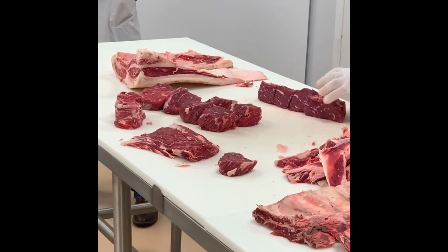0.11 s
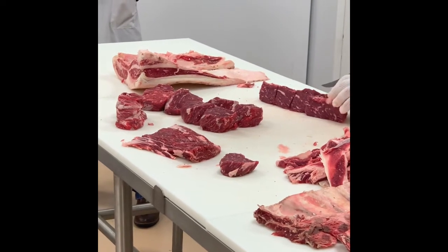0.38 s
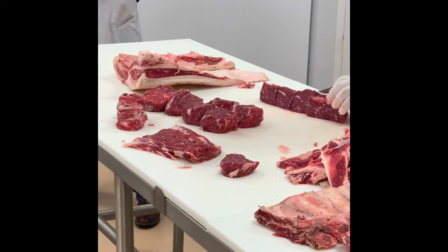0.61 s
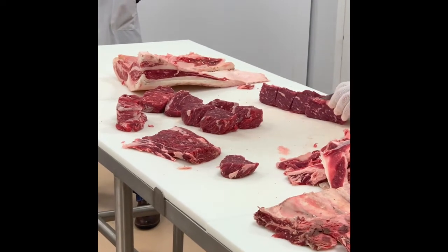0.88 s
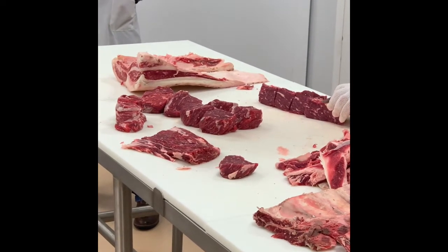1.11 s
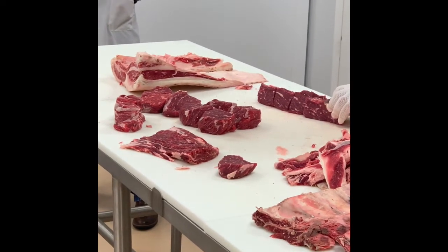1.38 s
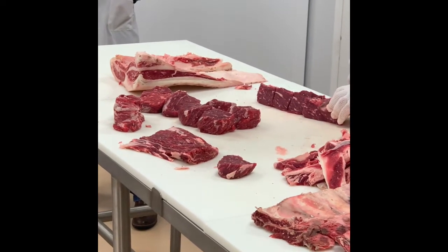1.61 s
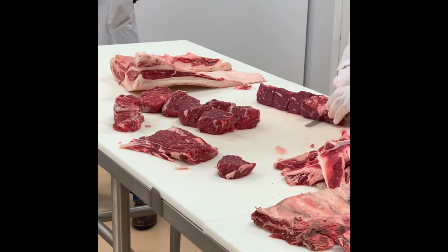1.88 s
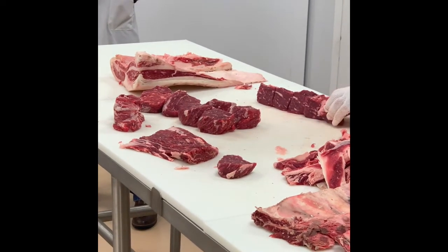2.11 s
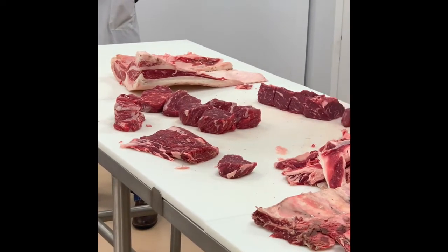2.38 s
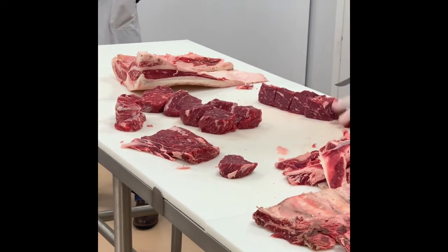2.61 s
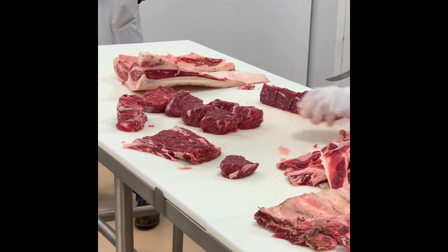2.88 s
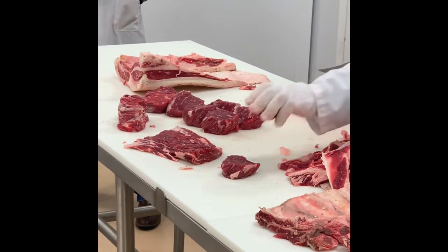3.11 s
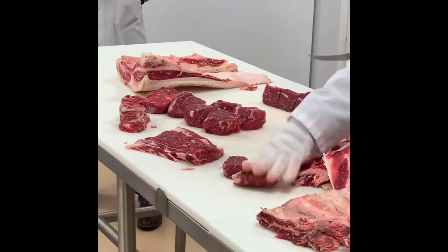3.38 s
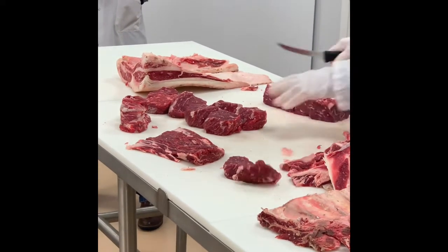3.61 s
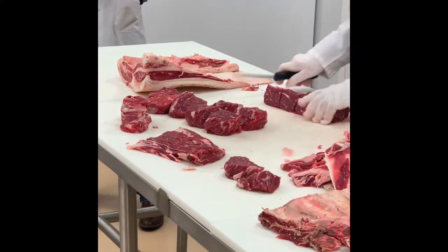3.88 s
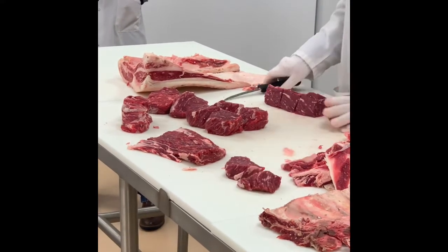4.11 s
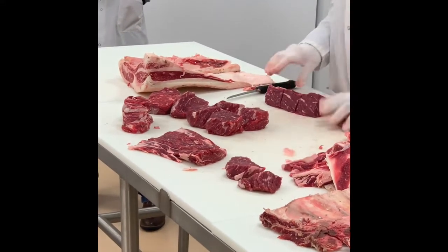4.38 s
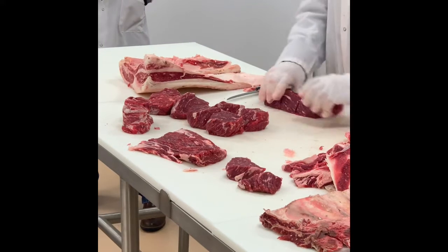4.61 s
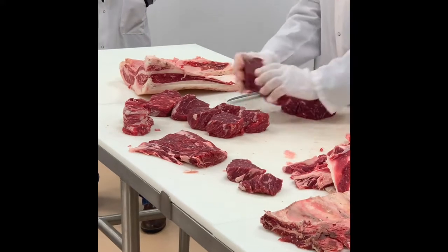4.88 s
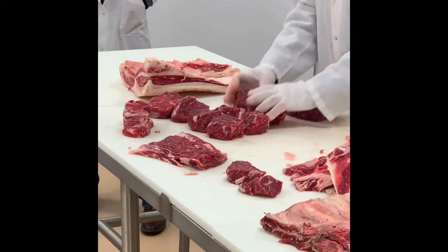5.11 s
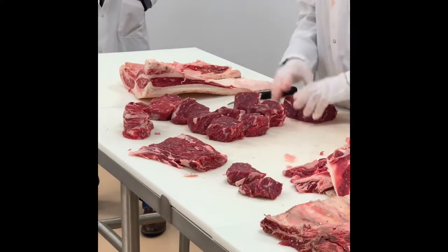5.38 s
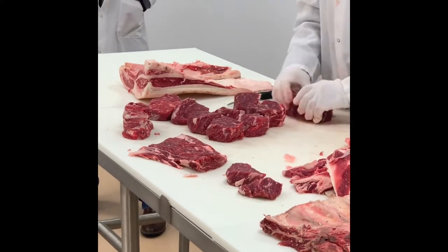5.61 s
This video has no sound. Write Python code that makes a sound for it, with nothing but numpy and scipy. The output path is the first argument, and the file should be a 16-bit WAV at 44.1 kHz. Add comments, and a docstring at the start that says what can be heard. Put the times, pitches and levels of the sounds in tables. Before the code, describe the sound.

A hard, tiled meat-cutting room, heard in close stereo for about six seconds. A cooling plant drones throughout: deep rumbling airflow, wavering low hum tones, two motors slowly beating and swelling around 3.3 s, and a very faint thin high whistle. A faint rub fades at the start. At about 1.9 s a knife passes through meat and meets the plastic board with a dull double thud; a soft friction scrape around 2.15 s draws it back. At 3.3 s a piece of meat slaps down, dry and soft, followed by a light rub at 3.7 s. At 4.0 s the knife is laid down: sharp clack, hissing scrape, quick fading bounces and a thin shivering steel rattle, then the loudest hollow knock at 4.2 s. Soft glove and meat smacks come around 4.55 s and 5.07 s, with faint ones between and a last faint rub near 5.7 s. Knocks leave a short room tail.

```python
"""A tiled cutting room with a cooling plant droning throughout: airflow, beating motors, a thin whistle.
At 1.9 s a knife cuts through meat onto a plastic board (ringing modes), then is drawn back (friction grains).
At 3.3 s a piece of meat is slapped down (dry click and puff). At 4.0 s the knife is laid aside with a rattle,
a shivering blade and a knock; soft smacks and a last rub follow. Two close microphone ports hear it all,
the left one slightly earlier in the upper range."""
import sys
import numpy as np
from scipy import signal
from scipy.fft import rfft, irfft, next_fast_len
from scipy.io import wavfile
from scipy.ndimage import uniform_filter1d

SR = 44100
rng = np.random.default_rng(int(sys.argv[2]) if len(sys.argv) > 2 else 0)


def store_pcm(level_fs):
    """Save levels as 16-bit WAV."""
    pcm = np.round(np.clip(level_fs, -1, 1) * 32767).astype(np.int16)
    wavfile.write(sys.argv[1], SR, np.atleast_2d(pcm).T)


def ratio(d):
    """dB to gain"""
    e = np.asarray(d, float) / 20
    return 10 ** e


N = 253663  # length in samples


def evened(x):
    """Scales to rms 1."""
    return x / np.sqrt(np.mean(x ** 2) + 1e-20)


def read(points, hz):
    """Reads a curve of (f/Hz, value) points on a log-frequency axis."""
    f, value = np.transpose(points)
    return np.interp(np.log(hz + 1), np.log(f + 1), value)


def coloured(x, points):
    """Filters by a dB spectrum without shifting phase."""
    hz = np.fft.rfftfreq(len(x), 1 / SR)
    return irfft(rfft(x) * ratio(read(points, hz)), len(x))


def burst(noise, colour, peak_s):
    """A short puff of coloured noise: quick rise to peak_s, then decay."""
    u = np.arange(len(noise)) / SR / peak_s
    return coloured(noise, colour) * u * np.exp(1 - u)


def drift(hold_s):
    """Slow chance of rms 1 that holds for about hold_s."""
    hz = np.fft.rfftfreq(N, 1 / SR)
    slow = rfft(rng.standard_normal(N)) * np.exp(-(hz * hold_s) ** 2)
    return evened(irfft(slow, N))


# first bounce of the knife: [thud level/dB, body level/dB, knock level/dB, edge level/dB, tick level/dB]
RATTLE = (-30.5, -34.5, -27.5, -41, -28)


def rattle(count=4):
    """The laid-down knife bounces: rows of blows whose gaps widen and whose levels fade."""
    start_s, base_gap_s, widen, fade_db = 4.0548, 0.005, 1.1, -1.5
    bounce = np.arange(count)
    late = np.cumsum(base_gap_s * widen ** bounce) - base_gap_s
    return [(start_s + late[k], *(np.array(RATTLE) + k * fade_db)) for k in range(count)]


# modes of board and table top: [f/Hz, level/dB, t60/s]
BOARD = [(145, -13.5, 0.086), (202, -4, .1), (242, -1, 0.1), (323.4, -4, 0.098), (440, 5, 0.04),
         (726, -1.5, 0.043), (1024, 5, 0.018), (1248, -2.5, 0.026), (1678, 4.5, 0.013), (2022, 8.5, 0.01),
         (2330, -3.5, 0.011), (2540, -8.5, 0.069), (3240, -12.5, 0.0077), (3660, -1, 0.019),
         (4480, -5, 0.039), (4440, -3.5, 0.0095)]
# centres of thud, body, knock and edge: [f/Hz]
PARTS_HZ = [300, 1000, 1900, 4000]
# blows on the board; the first four levels weight the modes near PARTS_HZ:
# [t/s, thud level/dB, body level/dB, knock level/dB, edge level/dB, tick level/dB]
BLOWS = [(1.8775, -37, -29, -21.5, -34.5, -54), (1.8806, -20.5, -25, -27, -37, -47),
         (4.0189, -34, -47, -15.5, -26.5, -31), (4.0222, -23.5, -33, -23.5, -30, -14),
         (4.2114, -33.5, -12.5, -4, -52.5, -27.5), (4.2150, -19, -14.5, -26, -32, -27),
         (4.230, -27, -18, -37, -44, -36)]
# colour of the contact tick: [f/Hz, level/dB]
TICK = [(3000, -35), (5000, 1), (7000, 5.5), (9500, 0.5), (12000, -5.5), (15000, 3), (16800, -15.5)]


def blows():
    """Each blow rings the board's modes and ticks; it also throws a broad clap into the room."""
    rows = BLOWS + rattle()
    size = 8192
    near, clap = np.zeros((2, N + size))
    t = np.arange(size) / SR
    pulse = np.arange(size) == 64  # late enough for the filter's pre-ring
    for (s, *parts, tick_db), noise in zip(rows, rng.standard_normal((len(rows), size))):
        start = round(s * SR)
        colour = list(zip(PARTS_HZ, parts))
        tick = ratio(tick_db) * burst(noise, TICK, 0.00042)
        near[start:][:size] += tick
        for k, (hz, db, t60) in enumerate(BOARD):
            # neighbour modes start opposed and beat
            rise = (-1) ** k * (1 - np.exp(-(t * hz / 0.76) ** 2))
            decay = ratio(db + read(colour, hz) - 60 * t / t60)
            near[start:][:size] += decay * rise * np.sin(2 * np.pi * hz * t)
        thud, _, knock, edge = parts
        spread = [(100, thud - 20)] + colour[:-1]
        spread += [(2250, knock - 5), (3300, edge - 3), colour[-1], (6000, edge - 25)]
        clap[start:][:size] += tick + 60 * coloured(pulse, spread)
    return near[:N], clap[:N]


# modes of the steel blade: [f/Hz, level/dB, t60/s]
BLADE = [(2225, -4, .03), (2460, -4, .06), (3450, -8, .03), (3750, -2, .04), (4050, -3.5, .03),
         (6900, -8, .02)]


def chatter():
    """The blade shivers on the board: tiny uneven contacts keep it ringing as it settles."""
    start_s, level_db, t60_s, contacts_per_s = 4.022, -36.5, 0.42, 460
    t = np.arange(N) / SR - start_s
    ring_t = np.arange(8192) / SR
    draw, size = rng.random(N), rng.standard_normal(N)
    ring = sum(ratio(db - 60 * ring_t / t60) * np.sin(2 * np.pi * hz * ring_t) for hz, db, t60 in BLADE)
    contact = (draw < contacts_per_s / SR) * (t > 0)
    taps = size * contact * ratio(level_db - 60 * np.maximum(t, 0) / t60_s)
    return signal.oaconvolve(taps, ring)[:N]


# strokes of blade and gloves; rise and fall each span 20 dB:
# [loudest t/s, rise/s, fall/s, bright hiss level/dB, dull scuff level/dB]
RUBS = [(0.0, .02, 0.14, -62.5, -54), (1.935, .05, 0.17, -74, -43.5), (2.15, 0.15, .17, -50.5, -50),
        (3.32, .01, 0.12, -62, -49), (3.66, 0.042, .2, -77, -46.5), (4.01, 0.1, .02, -60, -58),
        (4.028, 0.019, 0.046, -36, -31.5), (4.058, .015, 0.072, -37.5, -50),
        (4.58, 0.055, 0.12, -57, -49.5), (5.68, .15, .08, -63.5, -75)]
# colour of the bright hiss: [f/Hz, level/dB per Hz]
HISS = [(2500, -19.5), (4000, 1), (5500, 0), (7500, -5.5), (10000, -8), (12500, -8), (16000, -11)]
# colour of the dull scuff: [f/Hz, level/dB per Hz]
SCUFF = [(600, -12), (1250, -0.5), (1800, -4), (2500, -2), (3200, 1), (4000, -15), (5000, -20.5)]


def rubs():
    """Dense grains of friction under each stroke; the dull ones ring the board."""
    t = np.arange(N) / SR
    ring_t = t[:8192]
    grain_size = ratio(1.1 * rng.exponential(1, (2, N)))
    hiss, scuff = rng.standard_normal((2, N)) * grain_size
    ring = sum(ratio(db - 60 * ring_t / t60) * np.sin(2 * np.pi * hz * ring_t) for hz, db, t60 in BOARD)
    bright = evened(coloured(hiss, HISS))
    dull = evened(coloured(signal.oaconvolve(scuff, ring)[:N], SCUFF))
    power = np.zeros((2, N))
    for s, rise, fall, *levels in RUBS:
        below_db = 20 * np.maximum((s - t) / rise, (t - s) / fall)
        power += ratio(np.c_[levels] - below_db) ** 2
    return (np.sqrt(power) * (bright, dull)).sum(0)


# centres of the smack levels: [f/Hz]
SMACK_HZ = [800, 1800, 4000, 12000]
# smacks of meat and gloves: [t/s, then a relative level/dB at each of SMACK_HZ]
SMACKS = [(3.3105, -24, -21.5, -34, -38), (4.5422, -46, -31, -29.5, -48), (4.571, -55, -49, -43, -48.5),
          (4.646, -75, -72, -70, -49), (4.764, -75, -71, -57, -54), (5.039, -71, -66, -57, -55),
          (5.072, -30, -25, -46, -53), (5.62, -64, -64, -58, -58)]


def smacks():
    """Wet meat and gloves land or part: a dry click with a puff of noise and no ring."""
    size = 4096
    out = np.zeros(N + size)
    pulse = np.arange(size) == 64
    for (s, *parts), noise in zip(SMACKS, rng.standard_normal((len(SMACKS), size))):
        colour = [(200, parts[0] - 3)] + list(zip(SMACK_HZ, parts)) + [(16000, parts[-1] - 6)]
        click = 5 * coloured(pulse, colour)
        puff = 0.79 * burst(noise, colour, 0.0013)
        out[round(s * SR):][:size] += click + puff
    return out[:N]


# likeness of the two ports in a diffuse field: [f/Hz, likeness 0-1]
SAME = [(30, 1), (60, .9999), (130, .998), (290, .94), (640, .72), (1400, .45), (1900, .7), (3000, .4),
        (4500, .4), (6000, .6), (15000, .7)]
# phase by which the left port leads: [f/Hz, lead/rad]
LEAD = [(100, 0), (500, -.25), (1200, -.4), (2000, .6), (2900, 1.8), (3500, .8), (4000, .9), (5400, 3.1),
        (6800, 4.7), (8200, 6.3), (11500, 9.4), (15000, 12.6), (17000, 12.6)]
# balance, left minus right: [f/Hz, level/dB]
TILT = [(60, 0), (110, 0), (200, -.4), (700, -.4), (1290, -.8), (2380, -.8), (4400, 0), (15000, 0)]


def ports(a, b, diffuse):
    """Two microphone ports: shared part a, unshared part b, with a phase lead and a balance."""
    size = len(a)
    hz = np.fft.rfftfreq(size, 1 / SR)
    same = np.clip(1 - diffuse * (1 - read(SAME, hz)), 0, 1)
    shared = np.sqrt((1 + same) / 2) * rfft(a)
    apart = np.sqrt((1 - same) / 2) * rfft(b)
    skew = ratio(read(TILT, hz) / 2) * np.exp(.5j * read(LEAD, hz))
    return irfft(np.array([(shared + apart) * skew, (shared - apart) / skew]), size)


# echoes from near surfaces: [t/s, level/dB]
ECHOES = [(.0033, -10), (.0075, -14), (.011, -23.5), (.018, -17.5)]
# decay of the tail: [f/Hz, t60/s]
ROOM = [(200, 0.5), (500, 0.97), (1200, 0.82), (2300, 0.55), (3700, 0.73), (8000, 0.39), (15000, 0.29)]
# colour of the tail: [f/Hz, level/dB]
ROOM_DB = [(200, -6.5), (350, 8), (600, 1), (1200, -2.5), (1900, -12), (2800, -2), (4000, -4.5),
           (8000, -3.5), (15000, -11.5)]


def room(near, spread):
    """Direct sound, a few near echoes, and a tail whose bands die at their own speed."""
    early = np.zeros((2, SR))
    early[0, 0] = 1
    for k, (s, db) in enumerate(ECHOES):
        early[:, round(s * SR)] = ratio(db) * np.array([1, (-1) ** k])
    hz, t, z = signal.stft(rng.standard_normal((2, SR)), SR, nperseg=256)
    decay = ratio(-60 * t / read(ROOM, hz)[:, None])
    # equal energy per band before the colour, whatever its decay
    decay *= ratio(read(ROOM_DB, hz))[:, None] / np.sqrt((decay ** 2).sum(1, keepdims=True) * 128)
    fade_in = np.clip(np.arange(SR) / SR / 0.0016 - .3, 0, 1)
    tail = signal.istft(z * decay, SR, nperseg=256)[1][:, :SR] * fade_in
    # 256 samples of headroom for the phase lead, taken off again at the end
    near_path = np.roll(ports(*early, .5), 256, 1)
    tail_path = np.roll(ports(*tail, 1), 256, 1)
    heard = signal.fftconvolve(near[None], near_path, axes=1)
    heard = heard + signal.fftconvolve(spread[None], tail_path, axes=1)
    return heard[:, 256:N + 256]


# airflow of the cooling plant: [f/Hz, relative level/dB per Hz]
AIR = [(12, -41.5), (20, -21.5), (57, -5), (88, -12), (125, -9), (230, -17), (350, -16), (750, -21.5),
       (1100, -29.5), (2000, -34.5), (2900, -48.5), (3900, -46.5), (4600, -61), (5400, -85.5), (7500, -67),
       (12000, -61.5), (16000, -73)]
# duct and casing resonances in the airflow: [f/Hz, width/Hz, level/dB on the scale of AIR]
DUCT = [(18.8, 2.55, 5.5), (45.4, 2.6, -0.5), (60.3, 9.6, -5.5), (71.8, 5, -5.5), (117.5, 6.5, -8),
        (137.6, 4.9, -4), (205.6, 3.1, -4), (241.5, 3.1, -1.5), (278.4, 14.7, -5.5), (308.3, 6.1, -6.5),
        (401.8, 11.2, -10), (618.5, 17.7, -14.5), (1840, 41, -33.5), (2720, 180, -38.5), (552.4, 24, -15.5),
        (3660, 35, -40)]


def airflow():
    """Steady noise with narrow resonances, in faint drifting patches of time and frequency."""
    level_db, patch_db = -34, 1.31  # both rms
    size = next_fast_len(N)
    hz = np.fft.rfftfreq(size, 1 / SR)
    power = ratio(read(AIR, hz)) ** 2
    power += sum(ratio(db) ** 2 / (1 + (2 * (hz - f) / w) ** 2) for f, w, db in DUCT)
    noise = irfft(rfft(rng.standard_normal((2, size))) * np.sqrt(power), size)
    z = signal.stft(ports(*noise, 0.64), nperseg=1024)[2]
    patches = uniform_filter1d(rng.standard_normal(z.shape[1:]), size=14, axis=0)
    patches = uniform_filter1d(patches, size=8, axis=1)
    air = signal.istft(z * ratio(patch_db * evened(patches)), nperseg=1024)[1][:, :N]
    return ratio(level_db) * evened(air)


# wavering hum tones: [f/Hz, level/dB before the waver]
HUM = [(117.3, -43.5), (135.13, -42), (270.26, -44)]


def hum():
    """Tones waver by chance; two motors nearly in step swell and fade as they beat."""
    motor_hz, motor_db, partner = 162.7, -46.5, 1  # partner: second motor's share of the first
    beat_s, loudest_s = 3.73, 3.3
    waver, waver_s = 0.83, 0.13  # share of slow chance, and how long it holds
    t = np.arange(N) / SR
    beat = 1 + partner * np.exp(2j * np.pi * (t - loudest_s) / beat_s)
    tones = [(motor_hz, ratio(motor_db) * beat)]
    for hz, db in HUM:
        chance = (drift(waver_s) + 1j * drift(waver_s)) / 2
        tones.append((hz, ratio(db) * (1 + waver * chance)))
    return sum(np.sqrt(2) * (size * np.exp(2j * np.pi * (hz * t + rng.random()))).real
               for hz, size in tones)


def whistle():
    """A thin stream of air whistles: slow noise carried on a wandering pitch."""
    level_db, pitch_hz, pole_width_hz = -63.5, 3304, 155
    wander_hz, wander_s = 30, .05
    hz = pitch_hz + wander_hz * drift(wander_s)
    carrier = np.exp(2j * np.pi * np.cumsum(hz) / SR)
    a, b, c, d = rng.standard_normal((4, N))
    r = np.exp(-np.pi * pole_width_hz / SR)
    slow = signal.lfilter([1], [1, -2 * r, r * r], [a + 1j * b, c + 1j * d])
    return ratio(level_db) * evened(ports(*(carrier * slow).real, 0.44))


def scene():
    """Work at the board in the room, over the plant."""
    near, clap = blows()
    rub = rubs() + chatter()
    smack = smacks()
    work = room(near + rub + smack, clap + .5 * near + rub + .5 * smack)
    return work + airflow() + hum() + whistle()


def band_limit(x):
    """A steep low-pass at the top of the band."""
    return signal.sosfilt(signal.butter(12, 16810, fs=SR, output="sos"), x)


# band limit at the top end: [f/Hz, level/dB]
EDGE = [(15750, 0), (16000, -25), (16800, -26)]


def record(dry):
    """Limits the band at the top, then clips just under full scale."""
    padding = next_fast_len(N) - N
    limited = np.array([coloured(np.pad(x, (0, padding)), EDGE)[:N] for x in dry])
    mix = np.clip(limited, -.97, .97)
    return band_limit(mix)


dry = scene()
out = record(dry)
store_pcm(out)
```